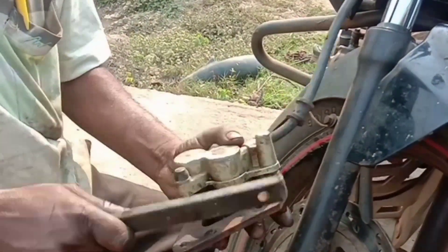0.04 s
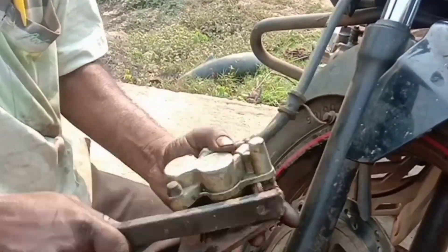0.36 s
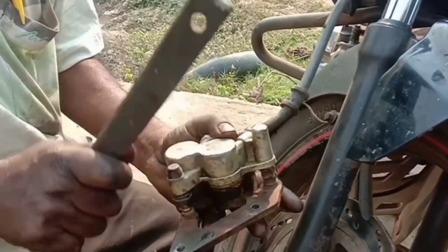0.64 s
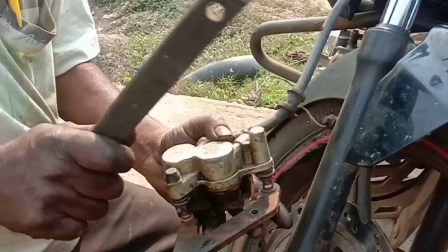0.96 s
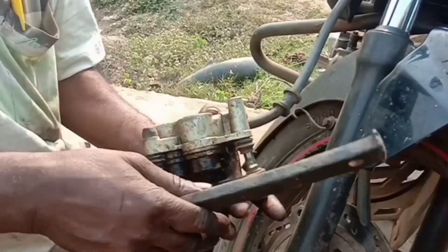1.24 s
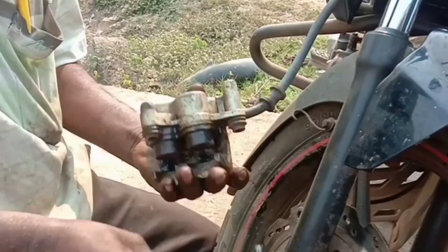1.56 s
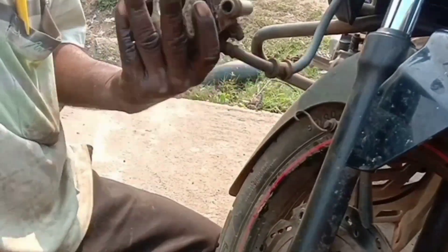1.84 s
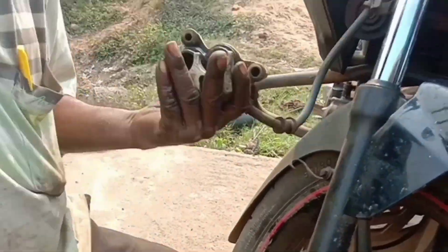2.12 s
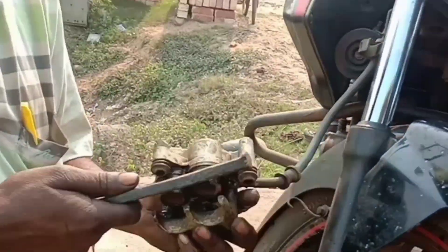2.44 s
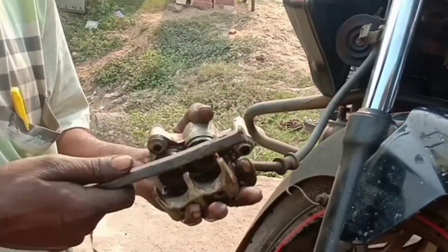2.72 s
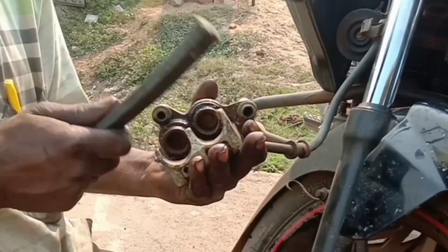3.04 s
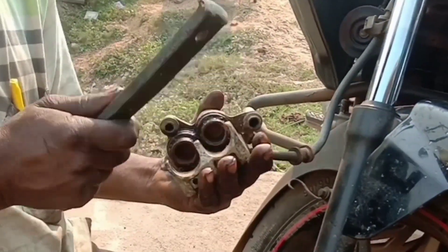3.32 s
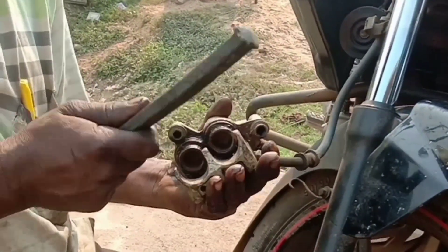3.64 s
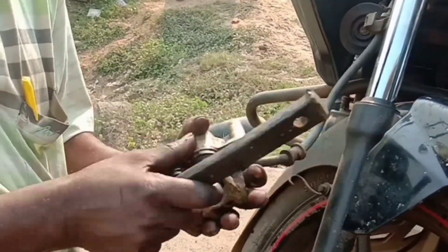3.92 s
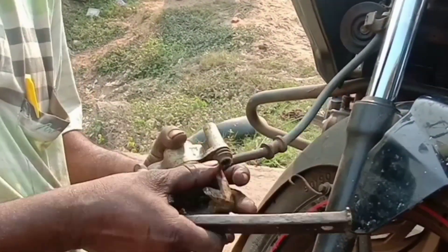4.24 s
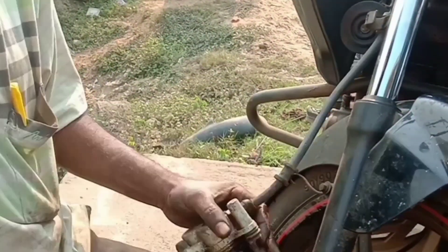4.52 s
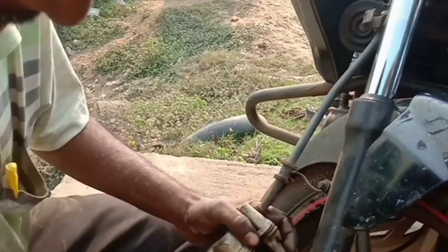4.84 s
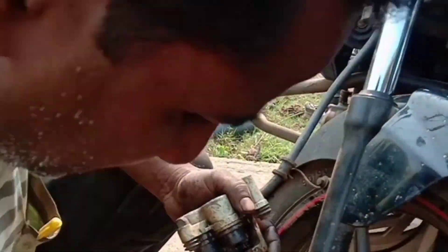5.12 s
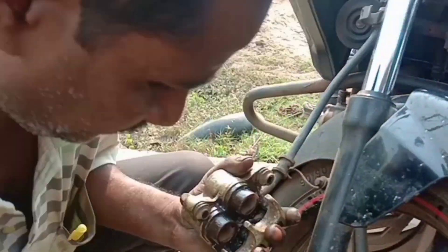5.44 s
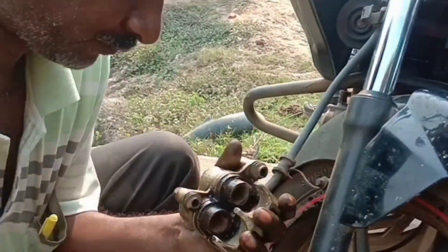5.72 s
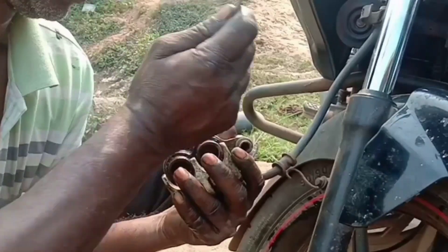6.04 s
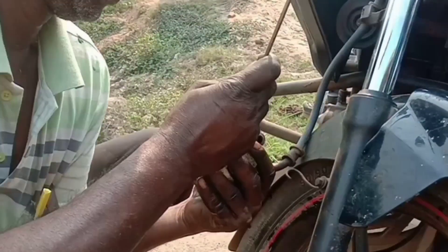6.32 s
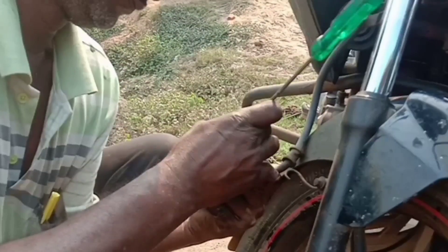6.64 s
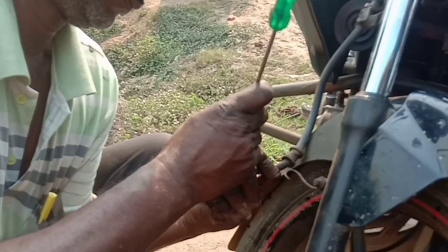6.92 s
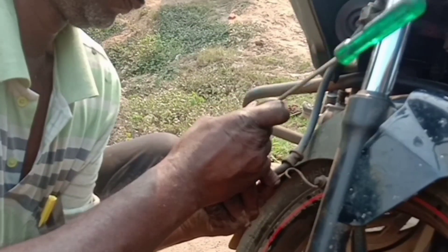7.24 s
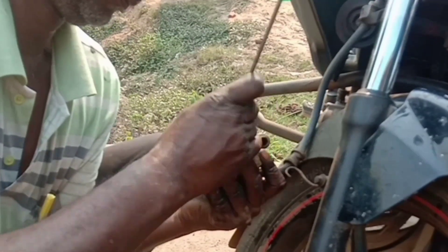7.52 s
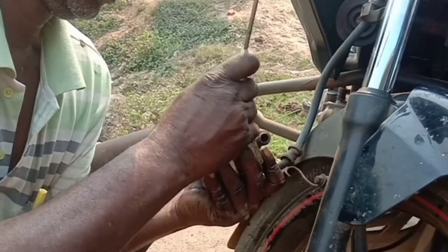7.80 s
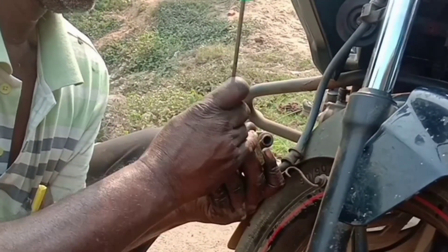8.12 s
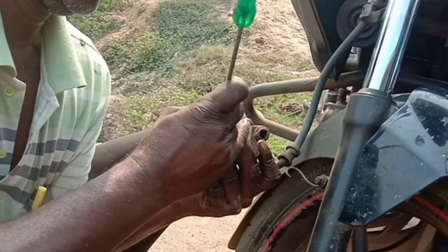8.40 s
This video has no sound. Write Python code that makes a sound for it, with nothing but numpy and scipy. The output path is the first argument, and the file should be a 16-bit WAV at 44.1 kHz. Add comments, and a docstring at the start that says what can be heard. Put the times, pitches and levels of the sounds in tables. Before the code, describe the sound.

A steel bar taps a hand-held metal brake caliper in a quick, even run of sharp, briefly ringing blows. Loose parts clink as wind buffets the close microphone, and a second run of taps follows. The caliper is then handled with small clinks and rattles, and a screwdriver scrapes and ticks faintly. Behind this roadside work are a low murmur, a distant small engine and a thin saw-like whine.

```python
"""A flat steel bar taps a hand-held brake caliper at the roadside, each impact exciting the modes of both.
The mechanic turns the caliper over: loose parts clink and slide, and a screwdriver scrapes in tiny
frictional slips. Turbulent gusts buffet the microphone. Further off a small engine chirrs past,
something like a power saw whines and briefly whistles, and faint chirps sound over the road's murmur."""
import sys
import numpy as np
from scipy import signal
from scipy.fft import rfft, irfft, next_fast_len
from scipy.io import wavfile
from scipy.ndimage import uniform_filter1d

SR = 44100
rng = np.random.default_rng(int(sys.argv[2]) if len(sys.argv) > 2 else 0)


def generate_wav(sig):
    """Save sig (samples, or channels by samples) to the path in sys.argv[1] as 16-bit PCM at SR."""
    pcm = np.round(np.clip(np.atleast_2d(sig).T, -1, 1) * 32767).astype(np.int16)
    wavfile.write(sys.argv[1], SR, pcm)


N = 377937
TIME = np.arange(N) / SR
AGE = np.arange(SR // 4) / SR  # seconds since a contact
SIDE = np.array([[1], [-1]])  # opposite sign in the two channels

# modes of the free bar: pitch_hz, level_db, t60_s
BAR_MODES = [(1945, 0, .09), (4326, 0, .12), (5005, 0, .08), (9205, 0, .08), (9410, -14, .08),
             (10605, -7, .1), (14620, -2, .1)]
# spectrum of a metal contact: frequency_hz, level_db
CRACK_SPECTRUM = [(300, -35), (900, -21.5), (1500, 7), (3000, 5), (5000, 4.5), (8000, 1), (10000, 4),
                  (12500, 6), (15500, -4.5)]


def taps(turned_s=1.7, grip_t60_share=.24):
    """Impact excitation: the bar chatters on the caliper and thuds into the hand, which damps the ring."""
    # start_s, thud_db, contact_s, crack_db, ring_db, cutoff_hz (higher for a harder contact)
    blows = [(.182, -17, 0.0026, -19, -25.5, 15770), (.373, -21, 0.0034, -20, -20.5, 15500),
             (0.5453, -16.5, 0.0047, -22, -23.5, 12160), (0.7211, -20.5, .0022, -18.5, -23, 14100),
             (0.8875, -18.5, 0.0028, -21, -26.5, 12900), (1.052, -19.5, 0.003, -17.5, -25, 16100),
             (1.2213, -19, .003, -19.5, -33, 16450), (2.623, -52, 0.00062, -17, -28, 10420),
             (3.0792, -39.5, 0.00068, -21, -36.5, 16800), (3.086, -48, 0.00076, -31, -52.5, 16570),
             (3.2538, -26, 0.0014, -19.5, -32.5, 16000), (3.4043, -22.5, .001, -21, -26.5, 15580),
             (3.5694, -18.5, 0.0023, -21.5, -24, 15120), (3.7265, -26.5, 0.0011, -15, -16, 13970),
             (3.882, -22, .0014, -20.5, -21.5, 15200)]
    # how strongly a blow excites the bar: frequency_hz, gain_db
    coupling = [(1950, -19), (4300, -12), (5000, -9.5), (9200, 0.5), (10600, 1), (14600, -2)]
    # caliper modes, struck on its closed back: pitch_hz, level_db, t60_s
    back_modes = [(1840, -34, 0.0097), (2670, -34, 0.011), (4350, -29, 0.018), (5260, -36.5, 0.025),
                  (7395, -33, 0.022), (9460, -27.5, 0.022), (10580, -24.5, 0.028)]
    # and on its open face, once turned: pitch_hz, level_db, t60_s
    face_modes = [(3307, -28.5, 0.024), (3495, -32.5, 0.05), (4045, -26, 0.014), (4970, -28.5, 0.03),
                  (8270, -40.5, 0.008), (11600, -26.5, 0.0091), (12400, -31.5, 0.01)]
    # the bar's faint lingering modes: pitch_hz, level_db, t60_s
    after_ring = [(4324, -61, .15), (4982, -50, .23), (9150, -57, .15), (10620, -52, .21),
                  (14620, -66, .12)]
    out = np.zeros(N)
    for start_s, thud_db, contact_s, crack_db, ring_db, cutoff_hz in blows:
        on_back = start_s < turned_s
        crack = undb(crack_db) * burst(t60=.016, hold_s=contact_s)
        hollow_hz = 968 * np.sqrt(.0028 / contact_s)  # a longer push sounds lower
        hollow = resonance(rng.standard_normal(len(AGE)), hollow_hz, width_hz=1030)
        hollow *= undb(-22) * fade(t60=.0082, hold_s=contact_s)
        caliper = rough_ring(back_modes if on_back else face_modes, contact_s)
        bracket = undb(-47) * rattle(t60=.11)  # still attached during the first blows
        gripped = [(hz, db + 4.5 + ring_db + np.interp(hz, *np.transpose(coupling)), t60 * grip_t60_share)
                   for hz, db, t60 in BAR_MODES]
        bar = ring(off_spot(gripped), hold_s=.00095) + ring(off_spot(after_ring))
        blow = crack + undb(thud_db) * thud(contact_s) + bar + caliper + on_back * (hollow + bracket)
        add(out, start_s, butterworth(blow, 4, cutoff_hz))
    return out


def thud(contact_s, start_hz=980, end_hz=97.5):
    """Compliant support: the pitch of a blow sinks as the hand gives way."""
    pitch_hz = end_hz + (start_hz - end_hz) * np.exp(-AGE / (.65 * contact_s))
    return -tone(pitch_hz) * fade(t60=.012, hold_s=1.96 * contact_s)


def off_spot(modes, scatter_db=3.5):
    """Mode shapes: no two blows land on the same spot, so each favours other modes."""
    return [(hz, db + scatter_db * rng.uniform(-2, 1), t60) for hz, db, t60 in modes]


def bar_clinks(soft_above_hz=9200, twist_hz=(4326, 14620), choke_db=-10):
    """Modal coupling: the point of contact decides which modes of the loosely held bar speak."""
    # start_s, contact_db, ring_db, tilt_db_per_octave, twist_db (how far off centre), buzz_s, t60_share
    touches = [(1.4229, -4, -29, -2, -9.5, .004, 0.99), (1.4335, -24, -45.5, 10.5, -14, .002, .5),
               (1.4396, -19.5, -34.5, 18, -21.5, 0.003, 0.82), (1.4883, -12, -31, 5, -4.5, 0.004, 0.25),
               (2.912, -54, -72.5, 4, -6, .005, 0.51), (3.0868, -30, -47.5, 20, 12, .002, .6),
               (4.9777, -37, -35, -6, -11, 0.0045, 1), (5.0217, -40, -41, -3, -7.5, .009, 0.45),
               (5.0453, -15, -28.5, 4.5, 3, 0.028, 0.91), (5.105, -32, -43, 8, -16, .002, 1)]
    out = np.zeros(N)
    for start_s, contact_db, ring_db, tilt, twist_db, buzz_s, t60_share in touches:
        modes = []
        for hz, db, t60 in BAR_MODES:
            db += tilt * np.log2(min(hz, soft_above_hz) / 5000) + twist_db * (hz in twist_hz)
            db -= 22 * np.log2(max(hz / soft_above_hz, 1))  # a light touch barely wakes the top modes
            modes.append((hz, db + ring_db, t60_share * t60))
        buzz = undb(ring_db - 10) * rattle(t60=.075)
        out *= np.interp(TIME, [start_s, start_s + .006], [1, undb(choke_db)])  # damps the earlier ring
        add(out, start_s, rough_ring(modes, buzz_s) + buzz + undb(contact_db - 18.5) * burst(t60=.036))
    return out


def caliper_clinks():
    """Free vibration: the caliper's loose parts collide, buzz and ring down."""
    # start_s, contact_db, contact_hz, low_ring_db, high_ring_db, buzz_s, decay_s
    collisions = [(2.095, -5.5, 8850, -32, -30.5, 0.0058, 0.25), (2.1159, -25, 6000, -29, -42, 0.016, 0.28),
                  (2.1438, -4.5, 12500, -39, -46, .002, 0.29), (2.178, -4, 3350, -26, -36, 0.0097, 0.1),
                  (5.5115, -3, 5300, -32.5, -44, 0.0011, 0.035),
                  (5.663, -23, 7500, -42.5, -54, .002, 0.092),
                  (5.6996, -8.5, 5650, -38, -43, 0.0026, 0.034), (5.8637, -16, 6800, -67, -51, .001, 0.024)]
    # modes of the parts: pitch_hz, level_db, relative_t60
    part_modes = [(2907, -15, 1.2), (3530, -21, .3), (4638, -5, .9), (4807, -21, .7), (5663, -1, .9),
                  (7257, -19, .9), (7598, -9, .9), (9604, -14, .7), (10430, -8, .5), (11750, -10, .8),
                  (12370, -9, .9), (14130, -15, .6)]
    out = np.zeros(N)
    for start_s, contact_db, contact_hz, low_db, high_db, buzz_s, decay_s in collisions:
        modes = [(hz, db + np.interp(hz, [6000, 9500], [low_db, high_db]), .8 * relative_t60 * decay_s)
                 for hz, db, relative_t60 in part_modes]
        buzz = undb(contact_db - 44) * rattle(t60=1.2 * decay_s)
        ringing = rough_ring(modes, buzz_s)
        contact = undb(contact_db - 24.5) * tick(contact_hz, width_hz=7100, t60=.039)
        add(out, start_s, ringing + contact + buzz)
    return out


def bracket_knocks():
    """Heavy damping: the bracket's modes die within a dull knock."""
    # start_s, level_db
    knocks = [(1.9167, -4), (2.106, -20), (2.625, -13.5), (2.644, -23.5), (5.513, -27), (5.7, -24),
              (5.864, -25)]
    # pitch_hz, level_db, t60_s
    modes = [(1330, 8.5, 0.034), (2340, 8.5, 0.03), (2990, 4, 0.036), (8240, -5, 0.0052)]
    out = np.zeros(N)
    for start_s, db in knocks:
        add(out, start_s, undb(db - 30) * ring(modes) + undb(db - 36) * tick(2800, 4000, t60=.08))
    return out


def small_parts():
    """Single resonances: pins ping on one note, and small dry contacts tick in one band."""
    # start_s, peak_db, pitch_hz
    pings = [(5.664, -29.5, 11780), (5.7013, -33, 10350), (5.8636, -27.5, 9940)]
    # start_s, level_db, centre_hz, width_hz
    ticks = [(0.8327, -19, 2900, 988), (.834, -36, 7500, 3500), (5.3234, -23.5, 9710, 5600),
             (5.3385, -22.5, 9300, 5530), (5.471, -23, 8800, 4100), (5.492, -23, 8300, 3040),
             (5.5456, -27, 6700, 3000), (5.6344, -21.5, 10100, 6000), (5.722, -11.5, 11600, 5000),
             (6.3964, -35.5, 8650, 4970), (6.5925, -27, 11400, 6500), (6.8828, -17, 11200, 6500),
             (6.956, -44, 9500, 5000), (7.509, -23, 10900, 5000), (7.5533, -25.5, 6300, 3720),
             (7.556, -36, 11500, 3000), (7.695, -23.5, 8800, 6000), (7.884, -24.5, 2880, 800),
             (7.886, -28, 8600, 7000), (7.93, -29, 5260, 4000), (8.549, -24.5, 6600, 6960)]
    out = np.zeros(N)
    for start_s, db, hz in pings:
        add(out, start_s, ring([(hz, db, .035)]))
    for start_s, db, hz, width_hz in ticks:
        add(out, start_s, undb(db - 14) * tick(hz, width_hz, t60=.021))
    return out


def sliding_parts():
    """Sliding friction: parts hiss broadly as the caliper is turned over."""
    # middle_s, half_length_s, level_db
    slides = [(4.527, 0.035, -67), (5.261, 0.068, -40), (5.37, 0.041, -58), (5.473, 0.033, -55)]
    out = np.zeros(N)
    for middle_s, half_s, db in slides:
        add(out, middle_s - half_s, friction(half_s, db, hz=7400, width_hz=14300))
    return out


def screwdriver(tip_width_hz=7400, picking_from_s=6.35, picking_db=-75.5):
    """Forced vibration: the scraping tip hisses and drives the casting; between strokes it picks."""
    # middle_s, half_length_s, hiss_db, hiss_hz, casting_db
    strokes = [(6.531, 0.021, -62.5, 5470, -58.5), (6.871, 0.014, -44, 11500, -71),
               (7.003, 0.03, -57, 10000, -79), (7.053, 0.041, -77, 11200, -61),
               (7.262, 0.063, -67, 12400, -84), (7.37, 0.043, -65, 12100, -88),
               (7.506, 0.016, -40, 12100, -57.5), (7.716, .022, -43, 12000, -55),
               (7.923, 0.028, -61, 10800, -61.5), (8.277, 0.027, -50.5, 10800, -81),
               (8.43, 0.033, -58, 12200, -74)]
    # resonances of the casting: centre_hz, width_hz
    casting_bands = [(930, 650), (1380, 250)]
    out = np.zeros(N)
    for middle_s, half_s, hiss_db, hiss_hz, casting_db in strokes:
        hiss = friction(half_s, hiss_db, hiss_hz, tip_width_hz)
        casting = sum(friction(half_s, casting_db, *band) for band in casting_bands)
        add(out, middle_s - half_s, hiss + casting)
    slips = grains(N, per_s=150, spread_db=.5) * np.clip(walk(19) - .5, 0, 1)
    picking = resonance(slips, 11800, tip_width_hz) * (TIME > picking_from_s)
    return out + undb(picking_db) * picking


def ring(modes, hold_s=0, detune=.00039):
    """Free decay of damped modes; each contact loads them a little differently."""
    out = np.zeros(len(AGE))
    for hz, db, t60 in modes:
        loaded_hz = hz * (1 + detune * rng.standard_normal())
        out += undb(db) * fade(t60, hold_s) * np.sin(2 * np.pi * (loaded_hz * AGE + rng.random()))
    return out


def rough_ring(modes, buzz_s, rough_db=3.5, rough_rad=.55, jolts_per_s=260, settle_s=.004):
    """Contact modulation: bouncing parts jolt each mode in level and phase; once apart they ring pure."""
    touching_s = np.minimum(AGE, buzz_s + settle_s)
    jolt_s = np.arange(jolts_per_s) / jolts_per_s
    jolts = lambda: np.interp(touching_s, jolt_s, np.tanh(rng.standard_normal(jolts_per_s)))
    out = np.zeros(len(AGE))
    for hz, db, t60 in modes:
        envelope = undb(db + rough_db * jolts()) * fade(t60, buzz_s)
        out += envelope * np.sin(2 * np.pi * (hz * AGE + rng.random()) + rough_rad * jolts())
    return out


def burst(t60, hold_s=0):
    """A brief contact radiates broadband noise."""
    return colour(rng.standard_normal(len(AGE)), CRACK_SPECTRUM) * fade(t60, hold_s)


def tick(hz, width_hz, t60):
    """The noise of one small contact excites a resonant band."""
    envelope = fade(t60)
    return resonance(rng.standard_normal(len(AGE)) * envelope, hz, width_hz) * rms(envelope)


def rattle(t60):
    """Repeated rebounds keep loose metal buzzing after a contact."""
    return colour(grains(len(AGE), per_s=1500), CRACK_SPECTRUM) * fade(t60)


def friction(half_s, db, hz, width_hz):
    """Stick-slip noise: dense tiny slips swell and die with one slide."""
    size = int(2 * half_s * SR)
    slips = grains(size, per_s=7000, spread_db=1.2)
    return undb(db) * resonance(slips, hz, width_hz) * np.hanning(size)


def wind(restless_db=5):
    """Turbulent pressure at the microphone: gusts over a breeze give low rumble and higher flutter."""
    # middle_s, length_s, rumble_db, flutter_db
    gusts = [(0.107, 0.11, -41.5, -77), (0.255, 0.026, -47.5, -75), (1.172, .08, -41, -65),
             (1.264, 0.1, -40, -55), (1.532, 0.044, -42.5, -51.5), (1.621, 0.045, -32, -52),
             (1.694, 0.091, -28.5, -31), (1.752, 0.036, -26, -24.5), (1.806, 0.036, -33.5, -33),
             (1.88, 0.064, -32.5, -39), (2.004, 0.071, -29.5, -36), (2.083, 0.042, -40, -30),
             (2.176, 0.037, -41, -34), (2.237, 0.081, -30, -35), (2.307, 0.11, -30, -32.5),
             (2.379, 0.024, -33, -37.5), (2.483, 0.094, -29.5, -37.5), (2.566, 0.053, -28, -41.5),
             (2.664, 0.068, -32.5, -33.5), (2.745, 0.099, -27.5, -32), (2.846, 0.075, -28, -40.5),
             (2.978, 0.12, -32.5, -46.5), (3.062, 0.045, -41, -51.5), (3.149, 0.083, -30.5, -34.5),
             (3.337, 0.13, -37, -46), (3.467, 0.068, -38, -46.5), (3.552, 0.037, -37, -44),
             (3.671, 0.095, -28.5, -42), (3.812, 0.061, -31.5, -44), (3.944, 0.07, -30.5, -42.5),
             (4.005, 0.072, -30, -40.5), (4.057, 0.073, -32, -45), (4.135, 0.069, -34, -59),
             (4.531, 0.032, -43.5, -65), (4.583, 0.028, -39.5, -55.5), (4.68, 0.064, -38, -41),
             (5.021, 0.087, -39, -55), (5.176, 0.073, -34.5, -50), (5.323, 0.046, -41.5, -66),
             (5.493, 0.065, -42.5, -65), (5.577, 0.02, -47, -66), (8.112, 0.163, -38, -59.5),
             (8.251, 0.074, -40, -65), (8.549, 0.054, -38.5, -42.5)]
    # time_s, level_db
    breeze_levels = [(0, -65), (.25, -51.5), (.7, -67), (1.45, -64), (1.7, -42), (2.9, -43.5),
                     (3.25, -55.5), (4.0, -46), (4.28, -49), (4.42, -64), (4.72, -54), (4.85, -68),
                     (5.1, -49.5), (5.3, -62.5), (5.68, -54.5), (5.9, -72), (7.95, -65), (8.2, -51.5),
                     (8.45, -64)]
    # frequency_hz, level_db
    rumble_spectrum = [(25, -26.5), (60, -22.5), (100, 0.5), (140, 3), (200, 0.5), (280, -6), (450, -33.5),
                       (900, -74), (4000, -100)]
    # frequency_hz, level_db
    flutter_spectrum = [(30, -45.5), (100, -34.5), (220, 0), (320, 9), (420, -2), (530, -13.5), (750, -37),
                        (1500, -63.5), (5000, -100)]
    low, high = np.zeros(N), np.zeros(N)
    for middle_s, length_s, rumble_db, flutter_db in gusts:
        swell = np.sin(np.linspace(0, np.pi, int(length_s * SR)))
        add(low, middle_s - length_s / 2, undb(rumble_db) * swell)
        add(high, middle_s - length_s / 2, undb(flutter_db) * swell ** 2)
    breeze = fader(breeze_levels) * undb(restless_db * walk(24))
    rumble = np.hypot(low, breeze) * eddies(rumble_spectrum)
    flutter = np.hypot(high, undb(-17.5) * breeze) * eddies(flutter_spectrum)
    return rumble + flutter + ports(rumble, side_db=-21) + ports(flutter, side_db=-8)


def eddies(spectrum, even_s=.03):
    """Turbulent noise, levelled over a few cycles so that the gusts shape it."""
    noise = colour(rng.standard_normal(N), spectrum)
    return noise / np.sqrt(uniform_filter1d(noise ** 2, int(even_s * SR)) + 1e-6)


def bump(start_s=5.159, peak_db=-19, pitch_hz=180, rise_s=.0033):
    """Damped oscillation: a soft knock on the microphone swells and dies in a few low cycles."""
    out = np.zeros(N)
    envelope = AGE / rise_s * np.exp(1 - AGE / rise_s)
    add(out, start_s, undb(peak_db) * np.sin(2 * np.pi * pitch_hz * AGE) * envelope)
    return out


def engine(cycle_hz=22.55, chirr_hz=1737, fall_hz=443, chirr_db=-1):
    """Periodic excitation: each cycle brings one falling chirr, while chatter rings the casing."""
    # resonances of the casing: centre_hz, nominal_width_hz, level_db
    casing_bands = [(1528, 80, 9.5), (1684, 100, 6.5), (1900, 87, 2.5), (2469, 110, 4)]
    turns = np.cumsum(cycle_hz * (1 + .004 * walk(2.6))) / SR
    cycle = turns % 1
    pitch_hz = chirr_hz - fall_hz * cycle + 30 * walk(23) + 45 * walk(500)
    swell = np.sin(np.pi * np.minimum(cycle / .8, 1)) ** 3
    chirr = unit(swell * undb(2 * walk(23)) * tone(pitch_hz))
    pulses = np.exp(-(3 * turns % 1) / .28)  # three a cycle
    chatter = (pulses + .57) * rng.standard_normal(N)
    casing = unit(sum(undb(db) * resonance(chatter, hz, 1.5 * width) for hz, width, db in casing_bands))
    return unit(casing + undb(chirr_db) * chirr)


def passing(sound, nearest_s=5.24, level_db=-48, approach_s=1.926, leave_s=.95):
    """Attenuation with distance: a far source nears slowly and is gone sooner, its treble lost."""
    since_s = TIME - nearest_s
    nearness = np.exp(-(since_s / np.where(since_s < 0, approach_s, leave_s)) ** 2)
    return butterworth(undb(level_db) * nearness * sound, 6, cutoff_hz=3300)


def saw_whine():
    """Random modulation: each partial of a far, saw-like whine flutters in strength and phase."""
    # pitch_hz, level_db, width_hz, t60_s
    partials = [(5000, -18.5, 55, .3), (5530, -20, 210, .3), (5696, -10, 58, 0.3), (6250, -7.5, 180, .6),
                (6410, -6, 130, .45), (6426, 1, 30, 0.55), (7000, -20.5, 180, .25), (8700, -27.5, 130, .2),
                (9370, -25.5, 90, .2)]
    out = np.zeros(N)
    for hz, db, width_hz, t60 in partials:
        flutter = walk(2 * width_hz) + 1j * walk(2 * width_hz) + .3
        partial = unit(np.real(flutter * np.exp(2j * np.pi * hz * TIME)))
        out += undb(db) * partial * cutting(t60)
    return out / np.sqrt(sum(undb(db) ** 2 for _, db, _, _ in partials))


def cutting(t60, bite_s=.0026):
    """Driven, then free vibration: the saw's gain rises quickly, holds through a cut and rings out."""
    # start_s, length_s, level_db
    cuts = [(0, 0.62, -59.5), (.5, 0.49, -65.5), (6.572, 0.028, -74), (7.048, 0.48, -48), (7.7, 0.042, -54),
            (7.904, 0.64, -48.5)]
    gain = np.zeros(N)
    for start_s, length_s, db in cuts:
        age = np.arange(int((length_s + t60) * SR)) / SR
        cut = np.zeros(N)
        add(cut, start_s, undb(db) * np.minimum(age / bite_s, 1) * fade(t60, length_s, age))
        gain = np.maximum(gain, cut)
    return gain


def whine_whistles(attack_s=.006, waver_hz=22):
    """Frequency modulation: brief thin whistles near 5 kHz, the whine's lowest partial, sag slightly."""
    # start_s, hold_s, level_db, pitch_hz, sag_hz_per_s
    whistles = [(0.089, 0.069, -42, 4990, 400), (0.222, 0.043, -57, 5000, 200),
                (8.383, 0.06, -54.5, 4920, 500)]
    out = np.zeros(N)
    for start_s, hold_s, db, hz, sag in whistles:
        pitch_hz = hz - sag * AGE + waver_hz * walk(300)[:len(AGE)]
        envelope = np.minimum(AGE / attack_s, 1) * fade(t60=.09, hold_s=hold_s)
        add(out, start_s, undb(db) * np.sqrt(2) * tone(pitch_hz) * envelope)
    return out


def chirps(half_s=.036, smear_hz=55):
    """Frequency glides: short whistles smeared by distance, most likely birds."""
    # middle_s, level_db, pitch_hz, glide_octaves_per_s
    calls = [(3.235, -70, 7800, 4), (4.274, -62, 1160, -0.5), (4.315, -64, 799, 1.5),
             (7.98, -60.5, 2227, 3), (8.092, -61, 1010, 1.5), (8.428, -57.5, 1790, 0),
             (8.473, -59, 970, -1), (8.565, -49.5, 2530, -2.8)]
    out = np.zeros(N)
    t = np.arange(-half_s, half_s, 1 / SR)
    for middle_s, db, hz, glide in calls:
        pitch_hz = hz * 2 ** (glide * t) + smear_hz * walk(500)[:len(t)]
        add(out, middle_s - half_s, undb(db) * np.sqrt(2) * tone(pitch_hz) * np.hanning(len(t)))
    return out


def yard(sound, tail_s=.052, wall_s=.0235, wall_db=-9, side_db=-4):
    """Reflection: a nearby wall answers once; scattered returns are thin and die quickly."""
    thin = butterworth(sound, 1, 1000, "high")
    scattered = unit(np.exp(-(AGE / tail_s) ** 1.6) * (AGE > .004))
    wall = unit(np.exp(-((AGE - wall_s) / .0015) ** 2))
    envelope = (scattered + undb(wall_db) * wall) / np.sqrt(len(AGE))
    mid, side = (signal.oaconvolve(thin, envelope * rng.standard_normal(len(AGE)))[:N] for _ in range(2))
    return mid + undb(side_db) * side * SIDE


def roadside(side_db=-13):
    """Ambient noise: a low outdoor murmur, nearly the same in both ears."""
    # frequency_hz, level_db
    spectrum = [(20, -34.5), (60, -15.5), (140, 4.5), (250, -5), (400, -8.5), (650, -20.5), (1500, -16),
                (2800, -20), (5000, -33.5), (9000, -39.5), (15000, -42)]
    # time_s, level_db
    levels = [(0, -60.5), (4.5, -62), (6.0, -59), (8.57, -59)]
    mid, side = (colour(rng.standard_normal(N), spectrum) * undb(walk(23)) for _ in range(2))
    return (mid + undb(side_db) * side * SIDE) * fader(levels)


def ports(sound, side_db):
    """Phase difference: as things move, the phase between the two microphone ports wanders."""
    quadrature = signal.hilbert(sound, next_fast_len(N)).imag[:N]
    return undb(side_db) * walk(34) * quadrature * SIDE


def undb(db):
    """Decibels to gain."""
    return 10 ** (np.asarray(db) / 20)


def rms(x):
    """Root mean square."""
    return np.sqrt(np.mean(x ** 2))


def unit(x):
    """Scale to rms 1."""
    return x / rms(x)


def tone(pitch_hz):
    """A sine whose phase is the integral of its pitch."""
    return np.sin(2 * np.pi * np.cumsum(pitch_hz) / SR)


def fade(t60, hold_s=0, age=AGE):
    """Exponential decay after a hold: 60 dB in t60 seconds."""
    return np.exp(-np.log(1000) * np.maximum(age - hold_s, 0) / t60)


def fader(rows):
    """Gain over time from rows of time_s, level_db."""
    return undb(np.interp(TIME, *np.transpose(rows)))


def colour(x, spectrum):
    """Filter by rows of frequency_hz, level_db, at rms 1."""
    hz, db = np.transpose(spectrum)
    size = next_fast_len(len(x))
    bin_hz = np.arange(size // 2 + 1) * SR / size
    gain = undb(np.interp(np.log(bin_hz + 1), np.log(hz), db))
    return unit(irfft(rfft(x, size) * gain, size)[:len(x)])


def resonance(x, hz, width_hz):
    """Two equal resonators in series give a steep-sided band, at rms 1."""
    b, a = signal.iirpeak(hz, hz / width_hz, fs=SR)
    return unit(signal.lfilter(b, a, signal.lfilter(b, a, x)))


def butterworth(x, order, cutoff_hz, kind="low"):
    """Low- or high-pass filter with a flat passband."""
    return signal.sosfilt(signal.butter(order, cutoff_hz, kind, fs=SR, output="sos"), x)


def walk(per_s):
    """Smooth random wander with a spread near 1."""
    points = rng.standard_normal(int(N / SR * per_s) + 2)
    return np.interp(TIME * per_s, np.arange(len(points)), points)


def grains(size, per_s, spread_db=0):
    """Random impulses of uneven strength."""
    impulses = (rng.random(size) < per_s / SR) * rng.standard_normal(size)
    return impulses * undb(spread_db * rng.exponential(size=size))


def add(track, start_s, sound):
    """Mix a sound in from start_s."""
    i = max(int(start_s * SR), 0)
    track[i:i + len(sound)] += sound[:N - i]


def scene(echo_db=-20.5):
    """Superposition: metalwork and distant sounds echo in the yard; the wind is at the microphone."""
    blows = taps()
    clinks = bar_clinks() + caliper_clinks() + bracket_knocks() + small_parts()
    clinks = butterworth(clinks, 4, 940, "high")  # the clinks keep little sound below about 1 kHz
    rubbing = sliding_parts() + screwdriver()
    distant = passing(engine()) + saw_whine() + whine_whistles() + chirps()
    direct = blows + clinks + rubbing + distant
    echoes = yard(undb(echo_db) * direct)
    return direct + echoes + wind() + bump() + ports(direct, side_db=-13) + roadside()


def record(dry, ceiling=.49, rumble_hz=50, top_hz=15400):
    """Band limiting and saturation: the deepest rumble and the top are cut, the hardest blows rounded."""
    rounded = ceiling * np.tanh(butterworth(dry, 2, rumble_hz, "high") / ceiling)
    return signal.sosfilt(signal.ellip(8, .2, 70, top_hz, fs=SR, output="sos"), rounded)


dry = scene()
out = record(dry)
generate_wav(out)
```